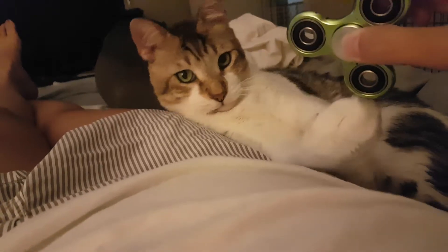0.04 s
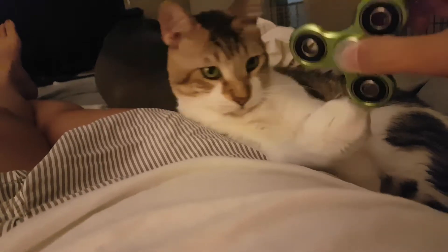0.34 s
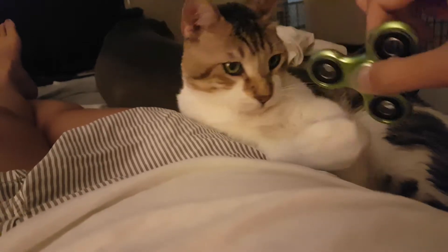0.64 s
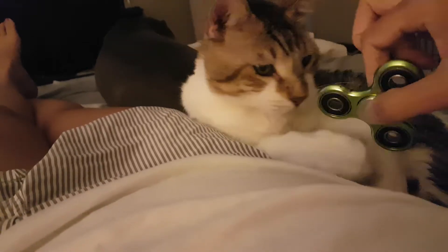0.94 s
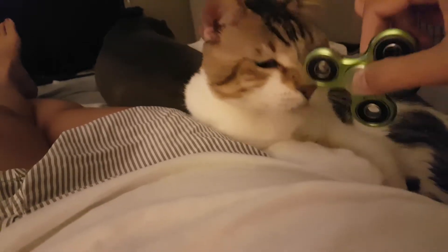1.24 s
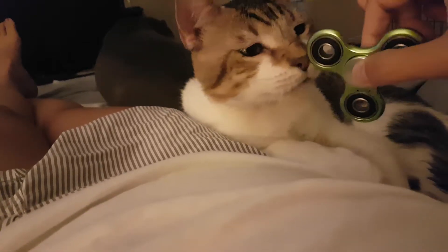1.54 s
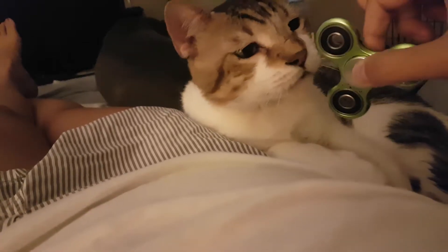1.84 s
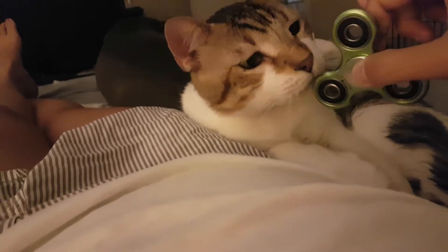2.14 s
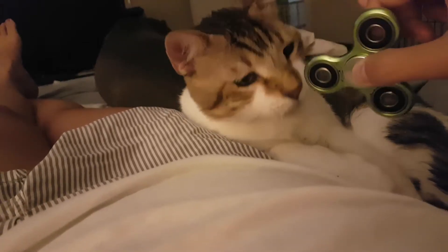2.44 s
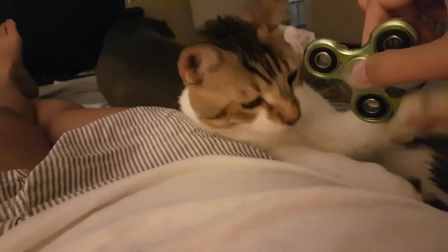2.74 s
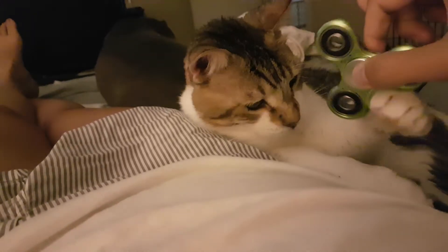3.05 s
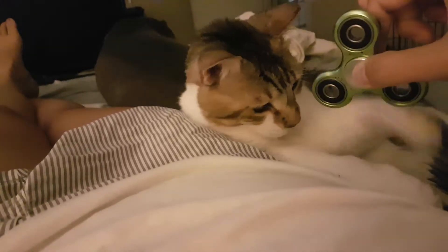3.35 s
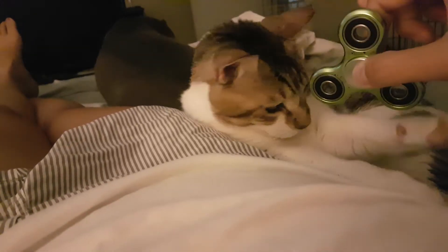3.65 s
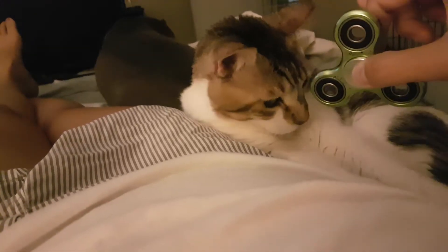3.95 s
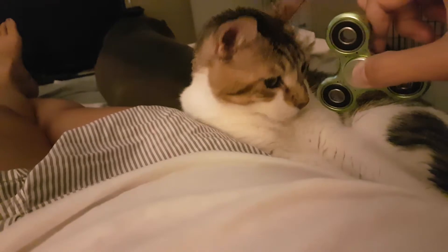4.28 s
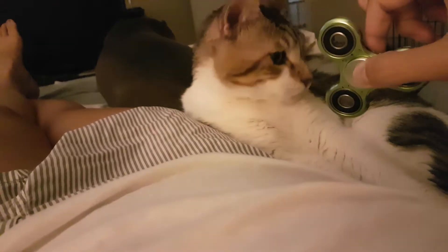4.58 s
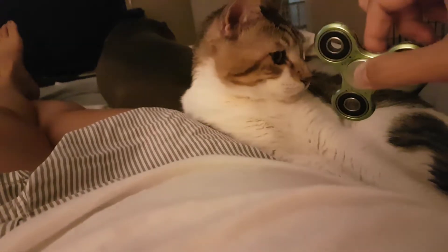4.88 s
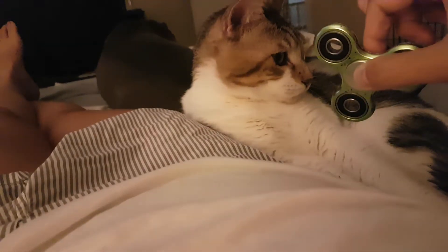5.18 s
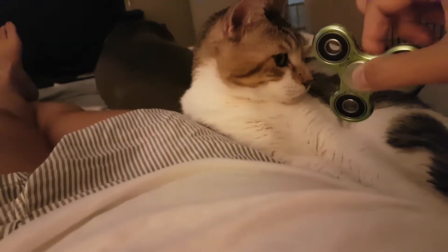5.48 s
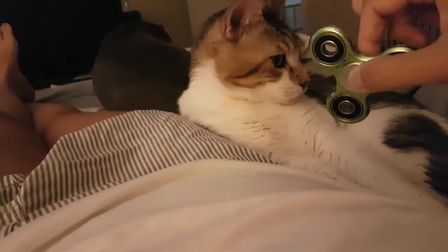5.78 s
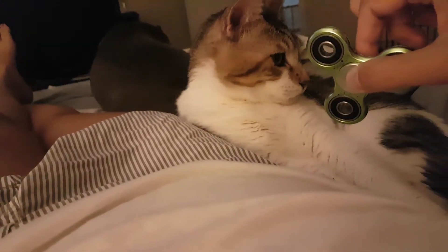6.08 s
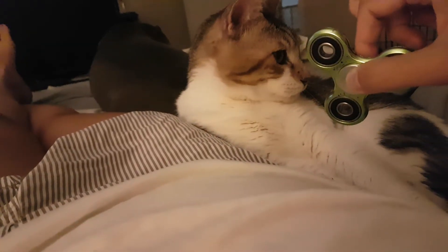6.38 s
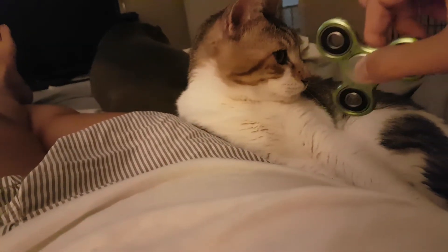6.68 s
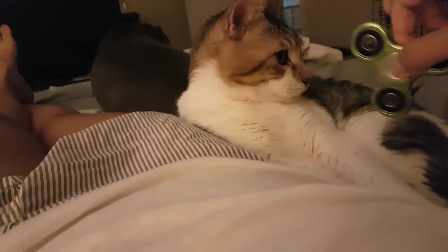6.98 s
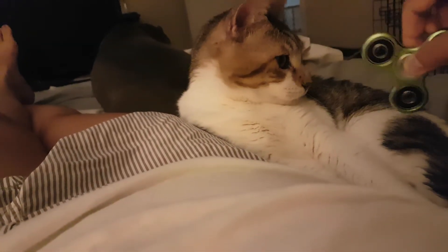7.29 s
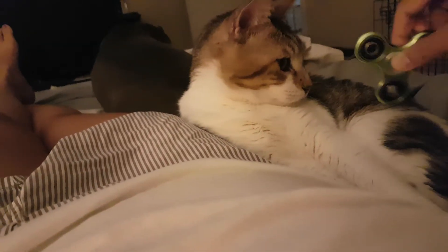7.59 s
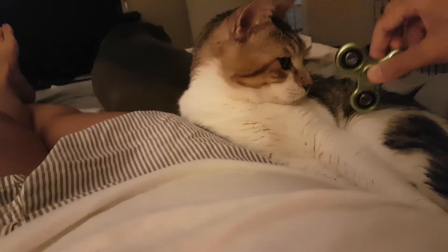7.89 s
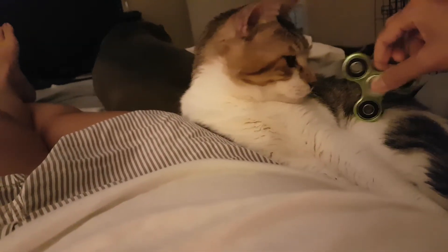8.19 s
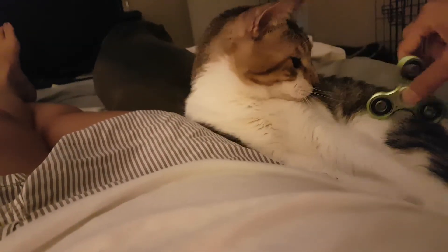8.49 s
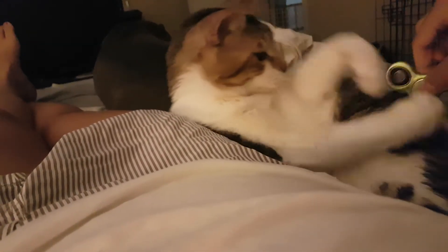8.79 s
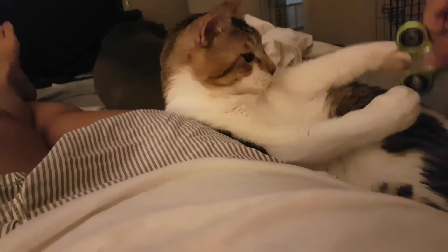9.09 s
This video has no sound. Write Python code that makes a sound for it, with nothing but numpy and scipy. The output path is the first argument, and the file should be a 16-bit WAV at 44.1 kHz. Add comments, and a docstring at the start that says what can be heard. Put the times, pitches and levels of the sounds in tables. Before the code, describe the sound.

Ventilation rumbles and hums in a quiet room over light microphone hiss. A cat purrs faintly in short runs through the first half. The left microphone pops once, a paw ticks against a fidget spinner, and the rumble dips for about two seconds. Fur and cloth rub softly. Near the end a distant motor swells through the walls, with a few more tiny ticks.

```python
"""Ventilation rumbles and hums in a quiet room, heard on a stereo pair of microphones over their own hiss.
On a bed a cat purrs faintly in short runs, its larynx pulsing through throat and chest, while a fidget
spinner is held to its nose. Fur and cloth rub, a paw brushes the toy with tiny ticks, and the left
microphone pops once. The low rumble and drone are ducked for about two seconds after the pop, as by a
recorder's wind suppression, then return. At the end a far motor swells through the walls."""
import sys
import numpy as np
from scipy import signal
from scipy.fft import rfft, irfft, next_fast_len
from scipy.io import wavfile

SR = 44100
rng = np.random.default_rng(int(sys.argv[2]) if len(sys.argv) > 2 else 0)


def transcribe(u):
    """Save the signal u as a 16-bit wav file named by the first command-line argument.

    u: samples, shape (n,) or (channels, n), limited to [-1, 1]; the rate is SR.
    q: integer samples, one column per channel.
    """
    v = np.clip(np.atleast_2d(u).T, -1, 1)
    q = np.round(v * 32767).astype(np.int16)
    wavfile.write(sys.argv[1], SR, q)


N = 402633
TIME = np.arange(N) / SR
SURGE_S, SURGE_HALF_S = 8.86, 0.28   # the far motor surges once


def from_db(db):
    """Decibels to amplitude."""
    return 10 ** (np.asarray(db) / 20)


def unit_rms(x):
    """Scale a signal to rms 1."""
    return x / np.sqrt(np.mean(x ** 2) + 1e-20)


def at_hz(points, hz):
    """Read a table on a log-frequency axis."""
    knots, values = np.transpose(points)
    return np.interp(np.log(np.maximum(hz, 1)), np.log(knots), values)


def pan(left_db):
    """Gains of the two microphones for a left-right difference."""
    return from_db(np.array([[.5], [-.5]]) * left_db)


def swell(s, half_s):
    """A smooth rise and fall of height 1."""
    return np.exp(-((TIME - s) / half_s) ** 2)


def ramp(s, length_s):
    """A straight rise from 0 to 1."""
    return np.clip((TIME - s) / length_s, 0, 1)


def wander(per_s):
    """A random drift with a spread of about 1."""
    knots = rng.standard_normal(SR)
    return np.interp(TIME * per_s, np.arange(len(knots)), knots)


def resonate(x, hz, width_hz):
    """A resonance with gain 1 at its peak."""
    r = np.exp(-np.pi * width_hz / SR)
    poles = [1, -2 * r * np.cos(2 * np.pi * hz / SR), r * r]
    return signal.lfilter(np.array([1, 0, -1]) * (1 - r * r) / 2, poles, x + 1e-18)


def pole_pair(hz, width_hz):
    """Coefficients of one resonance or notch, with gain 1 in the bass."""
    r = np.exp(-np.pi * width_hz / SR)
    pair = np.array([1, -2 * r * np.cos(2 * np.pi * hz / SR), r * r])
    return pair / pair.sum()


def decay(clicks, t60):
    """Each click leaves a tail that falls 60 dB in t60 seconds."""
    return signal.lfilter([1], [1, -np.exp(-np.log(1000) / (t60 * SR))], clicks + 1e-18)


def ring(clicks, hz, t60):
    """A unit click sets a sine of height 1 ringing."""
    r, w = np.exp(-np.log(1000) / (t60 * SR)), 2 * np.pi * hz / SR
    return signal.lfilter([0, np.sin(w)], [1, -2 * r * np.cos(w), r * r], clicks + 1e-18)


def diffuse(gain_at):
    """Stereo noise of a given colour and rms 1; long waves reach both microphones alike."""
    # likeness of the sound at the two microphones: f/Hz, correlation
    likeness = [(60, 0.98), (130, 0.96), (290, 0.79), (640, 0.32), (1410, 0), (3100, 0), (15000, 0)]
    size = next_fast_len(N)
    hz = np.arange(size // 2 + 1) * SR / size
    mid, side = rfft(rng.standard_normal((2, size)))
    alike = at_hz(likeness, hz)
    pair = np.sqrt(1 + alike) * mid + np.sqrt(1 - alike) * side * [[1], [-1]]
    return unit_rms(irfft(pair * gain_at(hz), size)[:, :N])


def rush(spectrum):
    """Broad noise of rms 1 with nothing below hearing."""
    return diffuse(lambda hz: from_db(at_hz(spectrum, hz)) * (hz > 20))


def hum(modes):
    """Noise held in narrow resonances, each with its own rms level."""
    def gain_at(hz):
        return np.sqrt(sum(from_db(db) ** 2 / width / (1 + ((hz - centre) / width) ** 2) ** 2
                           for centre, width, db in modes))
    total_rms = np.sqrt(sum(from_db(db) ** 2 for _, _, db in modes))
    return total_rms * diffuse(gain_at)


def ventilation(drone_hz=43, drone_width_hz=4):
    """Rumble, drone, hum and rushing air; the lows are ducked for about two seconds after the pop."""
    # spectrum of the rumble: f/Hz, relative level/dB
    rumble_spectrum = [(25, -24), (35, -14), (60, -4), (85, -2.5), (115, 7.5), (150, 2), (180, -1),
                       (240, -8), (330, -2), (420, -20), (700, -49)]
    # room resonances in the rumble: f/Hz, width/Hz, relative level/dB
    room_modes = [(72.3, 4, -10.5), (100.8, 7.3, -6), (149, 13, -13.5), (216.9, 10, -10), (280, 12.5, -10)]
    # swells of the deep drone: t/s, half length/s, level/dB
    drone_swells = [(.8, .8, -64.5), (2.797, 0.2, -56), (7.6, .3, -68)]
    # spectrum of the rushing air: f/Hz, relative level/dB
    air_spectrum = [(100, -6), (200, -2.5), (350, 0.5), (520, 0), (700, -1.5), (1000, -6), (1500, -9),
                    (2400, -12), (4000, -18), (6500, -25.5), (10000, -36.5), (16000, -55)]
    # bands of the ventilation's hum: f/Hz, width/Hz, level/dB
    hum_bands = [(276.6, 14, -75), (326.2, 6.5, -72.5), (430, 13, -72), (487, 8, -73.5), (580.7, 11, -78)]
    release = ramp(4.68, length_s=0.49)
    duck = ramp(2.95, length_s=0.75) - release   # a timed dip, like a recorder's wind suppression
    surge = from_db(2 * swell(SURGE_S, SURGE_HALF_S))   # the motor's surge lifts rumble and air with it
    rumble = from_db(-59) * rush(rumble_spectrum) + from_db(-56) * hum(room_modes)
    rumble *= surge * from_db(-14 * duck - release)   # comes back 1 dB weaker
    swells = sum(from_db(db) * swell(s, half_s) for s, half_s, db in drone_swells)
    drone = (from_db(-68.5 - 7.5 * duck) + swells) * hum([(drone_hz, drone_width_hz, 0)])
    air = surge * from_db(-66 - 0.66 * duck) * rush(air_spectrum)
    return (rumble + drone) * pan(left_db=-1.0) + hum(hum_bands) + air * pan(left_db=-0.35)


def microphone_noise(whine_hz=15083, drift_hz=18, jitter_hz=34, flicker_db=2.5):
    """The microphones' self-noise rises in the top octave and carries a thin wavering whine."""
    # spectrum of the self-noise: f/Hz, relative level/dB
    hiss_spectrum = [(2000, -12), (6000, -9), (9000, -6), (11500, -3), (14000, 2.5), (16000, -3)]
    hz = whine_hz + drift_hz * wander(per_s=1.5) + jitter_hz * wander(per_s=50)
    whine = np.sqrt(2) * np.sin(2 * np.pi * np.cumsum(hz) / SR)
    whine *= from_db(-87.5 + flicker_db * wander(per_s=40))
    return (from_db(-76) * rush(hiss_spectrum) + whine) * pan(left_db=1.0)


def purr_pulses(per_s=21.2, edge_db=1.5):
    """Evenly spaced pulses, softer at both ends of a run; yields t/s, pulse level/dB, puff/dB."""
    # runs of purring: first t/s, last t/s, pulse level/dB, growth over the run/dB, puff against pulse/dB
    runs = [(0.484, 0.667, -58, 0, -10), (0.949, 1.337, -57.5, 2, -12.5), (1.479, 1.67, -58, 1, -12.5),
            (1.78, 1.964, -53.5, 1, -19), (2.111, 2.162, -52, -3, -21), (2.841, 2.981, -56.5, 6, -10),
            (3.031, 3.305, -53, 0, -12.5), (3.354, 3.591, -51.5, 2, -15.5), (3.635, 3.733, -55.5, -6, -14),
            (4.1762, 4.272, -42, -8, -31)]
    for start, end, db, growth_db, puff_db in runs:
        for along in np.linspace(0, 1, round((end - start) * per_s) + 1):
            effort_db = growth_db * (along - .5) - edge_db * (2 * along - 1) ** 2
            yield start + along * (end - start), db + effort_db, puff_db


def purr(uneven_db=1.0, leak_db=-13, fur_hz=1900, body_hz=260):
    """On the bed, the larynx snaps about 21 times a second and puffs air; both ring in throat and chest."""
    # resonances of the cat, chest first, then throat: f/Hz, relative level/dB, t60/s
    modes = [(374, -7.5, 0.031), (670, -13, 0.007), (994, -7.5, 0.0071), (1310, -10, 0.0049),
             (1595, -23, 0.0029)]
    s, pulse_db, puff_db = np.transpose(list(purr_pulses()))
    chest_db = 11.5 + 0.75 * puff_db   # airy pulses stir the chest more
    scatter_db = uneven_db * rng.standard_normal((len(s), len(modes)))
    turbulence = rng.standard_normal(N) + .5 * rng.standard_normal((2, N))
    turbulence *= from_db(np.interp(TIME, s, puff_db))
    voice = 0
    for k, (hz, db, t60) in enumerate(modes):
        snaps = np.zeros(N)
        snaps[(s * SR).astype(int)] = from_db(pulse_db + db + chest_db * (k == 0) + scatter_db[:, k])
        puffs = decay(snaps, t60=0.016)
        leak = from_db(leak_db) * decay(snaps, t60=0.15)   # a little air rasps between the pulses
        voice = voice + ring(snaps + turbulence * (puffs + leak), hz, t60)
    # fur muffles the top, and so small a body radiates little bass
    voice = signal.sosfilt(signal.butter(2, fur_hz, fs=SR, output="sos"), voice)
    voice = signal.sosfilt(signal.butter(2, body_hz, "high", fs=SR, output="sos"), voice)
    return voice * pan(left_db=1.5)


def fur_and_cloth(q=3):
    """Fur and cloth slide softly as the cat and the hand shift."""
    # soft rubs: t/s, half length/s, centre f/Hz, level/dB
    rubs = [(2.24, .022, 1900, -72), (2.238, .016, 4400, -78), (3.0, .25, 2500, -78),
            (3.263, 0.065, 3960, -81), (6.95, .22, 2400, -80), (7.758, 0.024, 1850, -71),
            (7.87, 0.093, 2100, -73), (8.85, .25, 2200, -81)]
    friction = rng.standard_normal((2, N)) + 0.61 * rng.standard_normal(N)
    return sum(from_db(db) * swell(s, half_s) * unit_rms(resonate(friction, hz, hz / q))
               for s, half_s, hz, db in rubs)


def paw_on_spinner(tick_t60_s=0.0065, drag_delay_s=0.0093, drag_fade_db=8, rough_db=4):
    """Each touch is a tick that dies at once, then a short uneven drag, both coloured by the hard toy."""
    # touches of the paw, before the toy colours them: t/s, tick level/dB, drag level/dB, drag length/s
    touches = [(2.249, -61, -76, .015), (2.9317, -43.5, -56.5, 0.031), (3.01, -78, -72, .04),
               (8.75, -51, -67, 0.071), (8.869, -60, -80, .03), (9.031, -58, -73, .03)]
    # resonances of the spinner: f/Hz, width/Hz, relative level/dB
    spinner_modes = [(3900, 780, -5.5), (6370, 1000, -4.5), (8300, 1300, -3.5), (11200, 1200, -0.5),
                     (13200, 1400, -3.5), (15300, 1400, -5)]
    catches = from_db(rough_db * wander(per_s=400))
    contact = np.zeros(N)
    for s, tick_db, drag_db, drag_s in touches:
        at = int(s * SR)
        age = TIME[:min(N - at, SR // 4)]
        span = slice(at, at + len(age))
        tick = from_db(tick_db - 60 * age / tick_t60_s)
        along = np.clip((age - drag_delay_s) / drag_s, 0, 1)
        drag = np.sqrt(4 * along * (1 - along)) * from_db(drag_db - drag_fade_db * along)
        contact[span] += tick + drag * catches[span]
    friction = contact * (rng.standard_normal(N) + 1.2 * rng.standard_normal((2, N)))
    return sum((-1) ** k * from_db(db + 1.5) * resonate(friction, hz, width)
               for k, (hz, width, db) in enumerate(spinner_modes))


def microphone_pop(at_s=2.75138, swing_hz=100, damping=0.7, edge_hz=3800):
    """A sudden step in the left microphone; its bass roll-off makes a spike with one slow undershoot."""
    step = from_db(-2.8) * (TIME >= at_s) + 1e-12 * rng.standard_normal(N)
    w = 2 * np.pi * swing_hz
    bass_rolloff = signal.bilinear([1, 0, 0], [1, 2 * damping * w, w * w], SR)
    spike = signal.lfilter(*bass_rolloff, step)
    spike = signal.sosfilt(signal.butter(1, edge_hz, fs=SR, output="sos"), spike)
    # the microphone has a notch in the treble and a broad peak above it
    notch, peak = pole_pair(hz=8600, width_hz=860), pole_pair(hz=13900, width_hz=11000)
    return signal.lfilter(notch, peak, spike) * [[1], [0]]


def far_motor(start_s=6.95, start_hz=100.3, sag_hz_per_s=1.446, growth_db_per_s=2.5, surge_db=9):
    """Only the motor's fundamental comes through the walls; it sags in pitch as it swells."""
    age = np.maximum(TIME - start_s, 0)
    level_db = -56 + growth_db_per_s * age + surge_db * swell(SURGE_S, SURGE_HALF_S)
    phase = 2 * np.pi * np.cumsum(start_hz - sag_hz_per_s * age) / SR
    return ramp(start_s, length_s=.15) * from_db(level_db) * np.sin(phase) * pan(left_db=-1.4)


def scene():
    """Room tone, the cat on its bed and the far motor, with the microphones' own noises."""
    background = ventilation() + microphone_noise()
    cat = purr() + fur_and_cloth() + paw_on_spinner()
    return background + cat + microphone_pop() + far_motor()


def record(dry, cutoff_hz=16000):
    """The top is cut steeply."""
    return signal.sosfilt(signal.ellip(10, .1, 70, cutoff_hz, fs=SR, output="sos"), dry)


dry = scene()
out = record(dry)
transcribe(out)
```